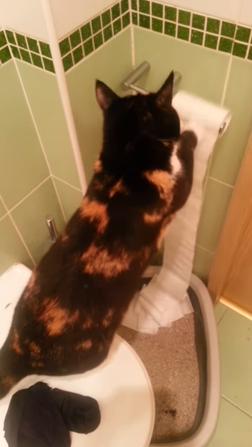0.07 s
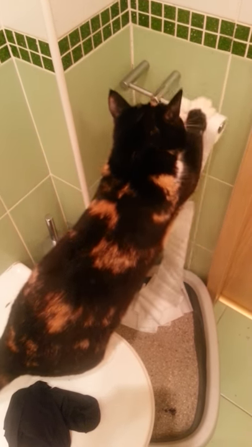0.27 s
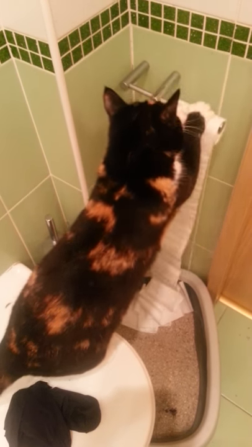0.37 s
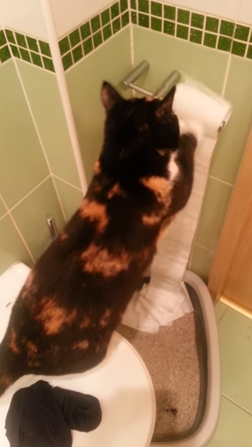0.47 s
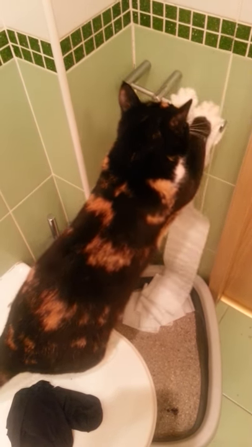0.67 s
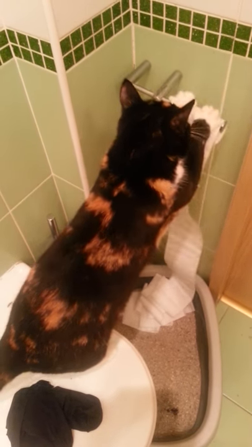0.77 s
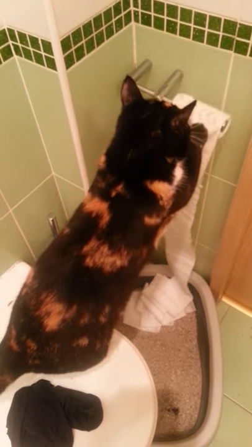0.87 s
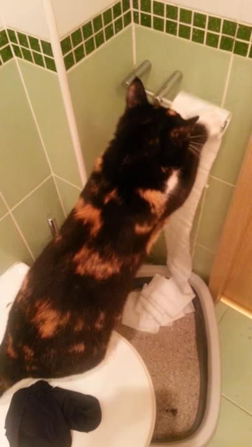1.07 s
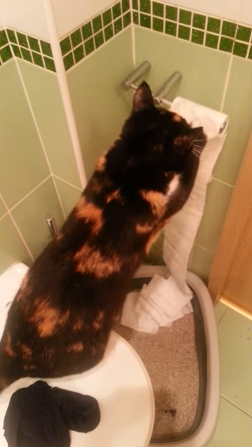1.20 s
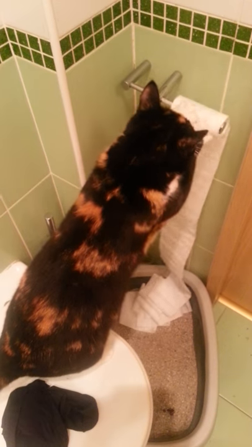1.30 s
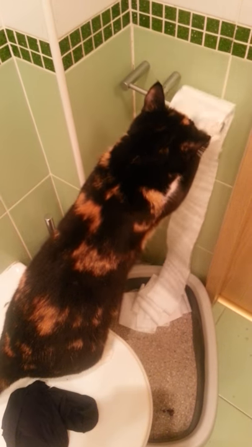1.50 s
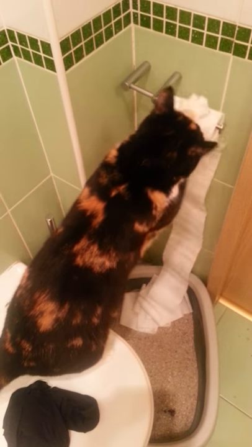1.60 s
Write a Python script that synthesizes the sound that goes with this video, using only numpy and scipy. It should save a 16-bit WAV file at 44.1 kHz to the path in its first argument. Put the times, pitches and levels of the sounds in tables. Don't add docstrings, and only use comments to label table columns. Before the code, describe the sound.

Toilet paper roll clacks and rattles on its metal holder as a cat paws the paper

```python
import sys
import numpy as np
from scipy import signal
from scipy.fft import rfft, irfft
from scipy.io import wavfile
from scipy.ndimage import uniform_filter1d

SR = 44100
rng = np.random.default_rng(int(sys.argv[2]) if len(sys.argv) > 2 else 0)


def volts_from_db(level):
    exponent = np.asarray(level, float) / 20
    return 10 ** exponent


def generate_wav(sig):
    pcm = np.round(np.clip(np.atleast_2d(sig).T, -1, 1) * 32767).astype(np.int16)
    wavfile.write(sys.argv[1], SR, pcm)


N = 72765

# (time [s], peak [dB], body re crack [dB])
CLACKS = [(0.173, -44.5, 0.5), (0.1866, -22.5, 1.5), (.198, -35.5, -0.5), (0.2333, -28.5, -4),
          (0.242, -27, -8), (.2495, -25, -13), (0.2562, -9.5, -6.5), (0.2582, -9.5, -8.5),
          (.268, -25.5, -1), (.4740, -40.5, 0.5), (.545, -36.5, 10), (.5526, -36.5, 3.5),
          (0.629, -23.5, -6.5), (0.6333, -25.5, -22), (0.6787, -19, 4), (0.6882, -15.5, -16),
          (.730, -47, 12.5), (1.1561, -47.5, 18), (1.4853, -32, -9), (1.498, -57, -12.5), (1.6339, -30, -5)]
# (start [s], rise [s], fall [s], rustle [dB], dull scrape re rustle [dB])
STROKES = [(-.05, 0.023, 0.063, -65.5, -3.5), (0.094, 0.036, 0.063, -54.5, -9), (.19, 0.013, 0.1, -47, 0),
           (.27, 0.027, 0.082, -41, -8), (.40, 0.035, 0.06, -60, -3), (.468, 0.021, 0.065, -46.5, -10.5),
           (0.533, 0.013, 0.12, -49.5, 0.5), (.585, 0.067, 0.088, -41.5, -1.5),
           (0.658, 0.083, 0.13, -55, 0), (0.851, 0.018, 0.077, -63.5, -1.5), (0.919, 0.02, 0.065, -60, -6),
           (1.048, 0.031, 0.083, -60.5, -10), (1.129, 0.026, 0.082, -50.5, -4),
           (1.229, 0.023, 0.078, -64.5, -9), (1.416, 0.047, 0.031, -52, -8.5),
           (1.471, 0.03, 0.027, -53.5, -9), (1.593, 0.058, 0.028, -45, -2.5)]
# (frequency [Hz], width [Hz], level [dB])
CORE_MODES = [(407, 190, 7.5), (813, 54, 0), (958, 110, 4.5), (1306, 300, 8), (1833, 286, 1),
              (2700, 210, -14)]
# (time [s], low arm mode [dB], second arm mode [dB], roll rumble [dB])
SWAY = [(0.0, -71, -62.5, -57), (0.096, -78, -86, -77), (0.21, -59.5, -51, -48),
        (0.294, -35.5, -38.5, -36.5), (0.334, -36.5, -52, -50), (0.394, -58.5, -61, -58),
        (0.464, -65.5, -85, -78.5), (0.55, -49, -44, -52), (0.702, -39.5, -36.5, -38.5),
        (0.808, -59, -57, -52.5), (0.844, -66, -66, -64.5), (1.126, -89.5, -83, -79.5),
        (1.184, -64, -57.5, -54.5), (1.332, -61, -83.5, -72), (1.4, -91, -102, -79.5),
        (1.52, -58.5, -59, -61), (1.59, -79.5, -80.5, -74), (1.65, -56, -64, -50.5)]
# (frequency [Hz], width [Hz], level [dB])
ROLL_MODES = [(74, 4.9, -27), (127.4, 20, -6), (274.3, 7.3, -0.5), (310, 17.2, 4), (340.5, 13, -8.5),
              (405, 11, -2), (435.6, 21, -1.5), (549, 11, 0), (564.3, 12, -16)]
# (time [s], level [dB])
BUMPS = [
    (.27, -59),
    (0.659, -73),
    (1.19, -62.5),
]
# (frequency [Hz], gain [dB])
LEFT_PORT = [(300, -36.5), (2000, -23), (3400, -20), (4600, -10.5), (7000, 0), (8600, -11), (11000, -18.5),
             (14000, -29.5)]
# (frequency [Hz], gain [dB])
RIGHT_PORT = [(300, -35.5), (2000, -21.5), (3400, -23.5), (4500, -7), (5600, -8), (7500, -18), (11000, -26),
              (14000, -37)]
# (frequency [Hz], density [dB per Hz])
FLOOR_SPECTRUM = [(25, -7), (60, -7.5), (170, -5.5), (400, -20), (1000, -18), (3000, -24), (6500, -14),
                  (14000, -27.5)]

CLACK_DB, CHATTER_DB, CHATTER_DECAY_S = 9.5, -12, 0.00043
TICK_BRIGHTNESS = 0.24
RUSTLE_DB, SCRAPE_LAG_S = -2.5, 0.0049
GRAINS_PER_S, GRAIN_SPREAD_DB, FLICKER_DB, FLICKER_HZ = 6000, 2.2, 1.2, 60.0
ARM_HZ, ARM_WANDER_SHARE, ARM_WANDER_HZ = (151.9, 189.4), 0.025, 36.0
ARM_FLICKER_DB, ARM_FLICKER_HZ = 1.2, 43.0
RUMBLE_SIDE_DB, ARM_SIDE_DB = -16.5, -24
BUMP_HZ, BUMP_RISE_S = 78.4, 0.033
ROOM_T60_S, ROOM_DB, ROOM_GAP_S = 0.21, 5.5, 0.005
CORNER_S, CORNER_DB, PORT_LAG_S = 0.004, 4, 0.0003
FLOOR_DB, FLOOR_HISS_DB = -72.5, 11.5
GATE_DB, GATE_HZ, GATE_SLOPE, GATE_DEPTH_DB, GATE_S = -48.5, 260, 0.75, 12, 0.014
TOP_HZ = 14100


def unit(x):
    return x / np.sqrt(np.mean(x ** 2))


def curve(table, column):
    rows = np.array(table)
    return volts_from_db(np.interp(np.arange(N) / SR, rows[:, 0], rows[:, column]))


def walk(rate_hz):
    span = int(SR / rate_hz)
    return unit(uniform_filter1d(uniform_filter1d(rng.standard_normal(N), span), span))


def filter_unit(x, impulse):
    return signal.fftconvolve(x, impulse / np.sqrt(np.sum(impulse ** 2)))[:N]


def colour(x, points):
    rows = np.array(points)
    hz = np.maximum(np.arange(2049) * SR / 4096, 1)
    gain_db = np.interp(np.log(hz), np.log(rows[:, 0]), rows[:, 1])
    cepstrum = irfft(np.log(volts_from_db(gain_db)))
    cepstrum[1:2048] *= 2
    cepstrum[2049:] = 0
    return filter_unit(x, irfft(np.exp(rfft(cepstrum))))


def ring(x, modes):
    click = np.eye(1, 8192)[0]
    impulse = 0
    for hz, width_hz, db in modes:
        mode = signal.lfilter(*signal.iirpeak(hz, hz / width_hz, SR), click)
        impulse = impulse + volts_from_db(db) / np.sqrt(width_hz) * mode
    return filter_unit(x, impulse)


def clacks():
    t = np.arange(200) / SR
    crack, body = np.zeros(N + len(t)), np.zeros(N + len(t))
    for s, db, body_db in CLACKS:
        i = int(s * SR)
        chatter = rng.standard_normal(len(t)) * np.exp(-t / CHATTER_DECAY_S)
        tick = (t == 0) + volts_from_db(CHATTER_DB) * chatter
        crack[i:i + len(t)] += volts_from_db(db + CLACK_DB) * tick
        body[i:i + len(t)] += volts_from_db(db + CLACK_DB + body_db) * tick
    crack = crack - TICK_BRIGHTNESS * np.roll(crack, 1)
    return crack[:N], body[:N]


def crackle(dull):
    sizes = volts_from_db(GRAIN_SPREAD_DB * rng.exponential(size=N)) * rng.standard_normal(N)
    grains = (rng.random(N) < GRAINS_PER_S / SR) * sizes
    t = np.arange(N) / SR - dull * SCRAPE_LAG_S
    swell = 0
    for s, rise_s, fall_s, db, dull_db in STROKES:
        phase = np.interp(t, [s, s + rise_s, s + rise_s + fall_s], [0, np.pi / 2, np.pi])
        swell = swell + volts_from_db(db + dull * dull_db) * np.sin(phase) ** 1.26
    return unit(grains) * volts_from_db(FLICKER_DB * walk(FLICKER_HZ) + RUSTLE_DB) * swell


def arm_mode(hz, column):
    pitch_hz = hz * (1 + ARM_WANDER_SHARE * walk(ARM_WANDER_HZ))
    tone = np.sqrt(2) * np.sin(2 * np.pi * np.cumsum(pitch_hz) / SR)
    return tone * volts_from_db(ARM_FLICKER_DB * walk(ARM_FLICKER_HZ)) * curve(SWAY, column)


def rumble():
    return ring(rng.standard_normal(N), ROLL_MODES) * curve(SWAY, 3)


def holder():
    low, second = arm_mode(ARM_HZ[0], 1), arm_mode(ARM_HZ[1], 2)
    mid = rumble() + low + second
    side = volts_from_db(RUMBLE_SIDE_DB) * rumble() + volts_from_db(ARM_SIDE_DB) * (low - second)
    return mid + side * np.array([[1], [-1]])


def bumps():
    thuds = 0
    for s, db in BUMPS:
        age_s = np.maximum(np.arange(N) / SR - s, 0)
        envelope = np.e * age_s / BUMP_RISE_S * np.exp(-age_s / BUMP_RISE_S)
        thuds = thuds + volts_from_db(db) * envelope * np.sin(2 * np.pi * BUMP_HZ * age_s)
    return thuds


def tiles(x):
    t = np.arange(SR // 2) / SR
    noise = rng.standard_normal((2, len(t)))

    def share(h, db):
        return h * volts_from_db(db) / np.sqrt(np.sum(h ** 2, axis=1, keepdims=True))

    decay = np.exp(-np.log(1000) * t / ROOM_T60_S)
    tail = share(noise * decay * (t > ROOM_GAP_S), ROOM_DB)
    corner = share(noise * (t < CORNER_S) * (t > PORT_LAG_S), CORNER_DB)
    impulse = tail + corner
    impulse[0, 0], impulse[1, int(PORT_LAG_S * SR)] = 1, 1
    total = np.sqrt(1 + volts_from_db(2 * ROOM_DB) + volts_from_db(2 * CORNER_DB))
    return np.array([signal.fftconvolve(x, h)[:N] for h in impulse]) / total


def noise_floor():
    floor = [colour(rng.standard_normal(N), FLOOR_SPECTRUM) for _ in range(2)]
    floor = volts_from_db(FLOOR_DB) * np.array(floor)
    highpass = signal.butter(2, GATE_HZ, "high", fs=SR, output="sos")
    return floor + (volts_from_db(FLOOR_HISS_DB) - 1) * signal.sosfilt(highpass, floor)


def scene():
    crack, body = clacks()
    bright = tiles(crack + crackle(False))
    dull = tiles(ring(body + crackle(True), CORE_MODES))
    left = volts_from_db(7.0) * colour(bright[0], LEFT_PORT)
    right = volts_from_db(2.0) * colour(bright[1], RIGHT_PORT)
    core = dull * volts_from_db(np.array([[1.5], [2.5]]))
    return np.array([left, right]) + core + holder() + bumps() + noise_floor()


def roll_off(x):
    return signal.sosfilt(signal.butter(12, 15550, fs=SR, output="sos"), x)


def record(dry):
    lowpass = signal.butter(2, GATE_HZ, fs=SR, output="sos")
    low = signal.sosfiltfilt(lowpass, dry, padtype="even")
    high = dry - low
    span = int(GATE_S * SR)
    power = uniform_filter1d(uniform_filter1d(np.mean(high ** 2, axis=0), span), span // 2)
    level_db = 10 * np.log10(power + 1e-12)
    gate_db = np.clip(GATE_SLOPE * (level_db - GATE_DB), -GATE_DEPTH_DB, 0)
    gated = low + high * volts_from_db(gate_db)
    mix = signal.sosfilt(signal.butter(12, TOP_HZ, fs=SR, output="sos"), gated)
    return roll_off(mix)


dry = scene()
out = record(dry)
generate_wav(out)
```